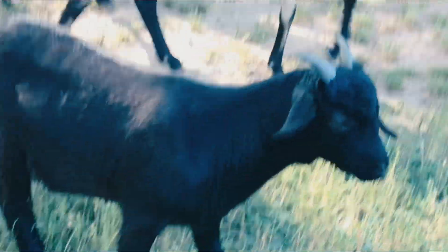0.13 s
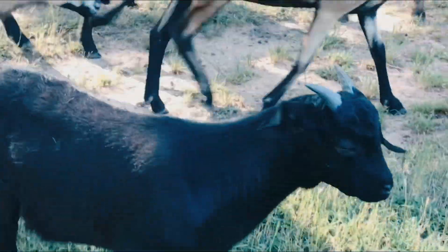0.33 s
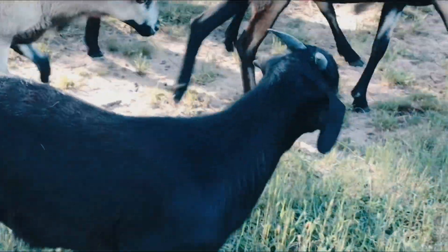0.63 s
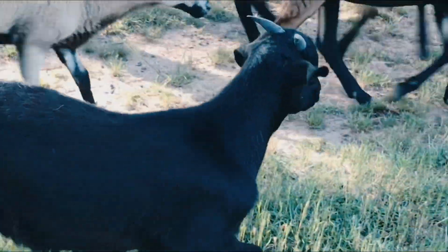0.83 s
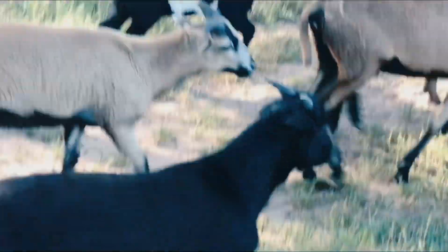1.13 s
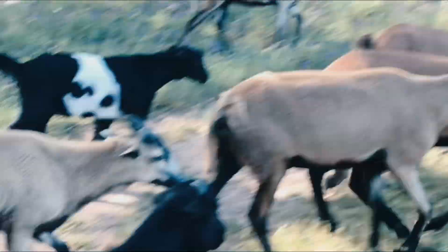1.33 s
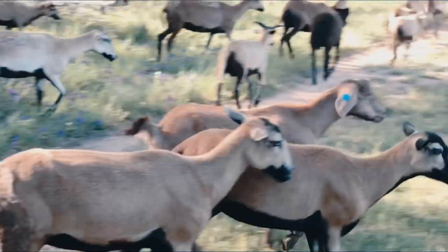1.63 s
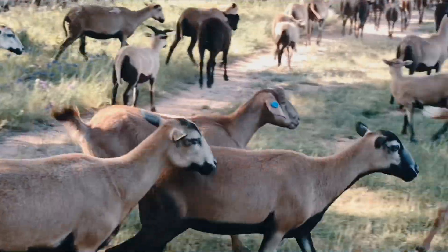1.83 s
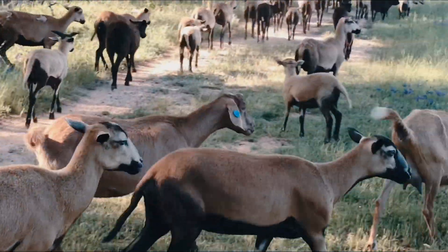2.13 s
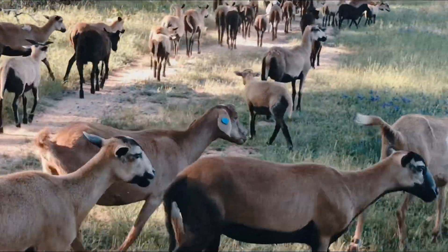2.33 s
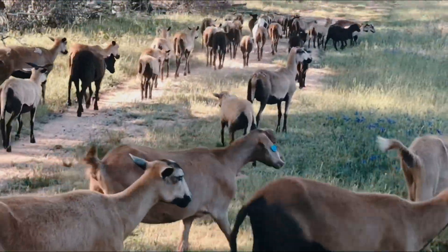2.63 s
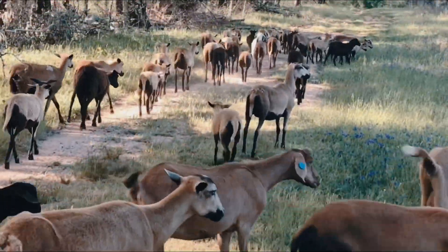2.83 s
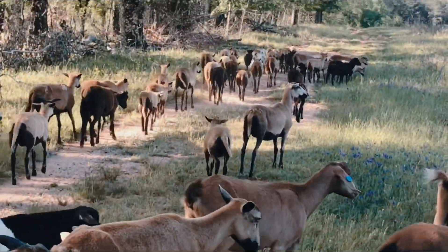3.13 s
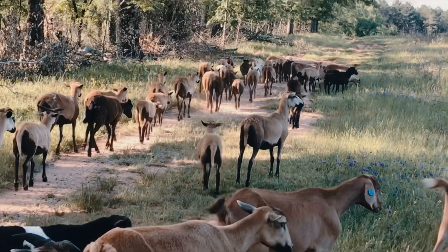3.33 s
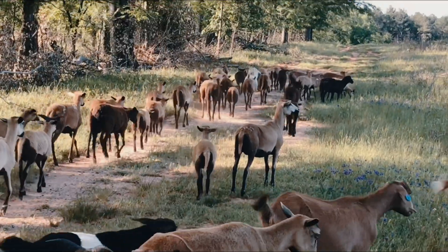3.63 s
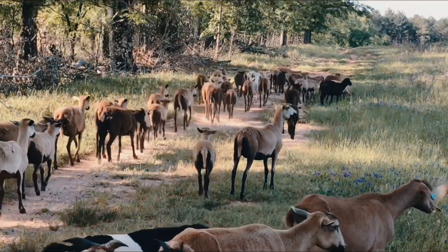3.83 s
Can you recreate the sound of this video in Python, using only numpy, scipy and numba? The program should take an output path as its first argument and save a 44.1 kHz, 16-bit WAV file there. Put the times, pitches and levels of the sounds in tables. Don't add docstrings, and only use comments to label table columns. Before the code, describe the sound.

A sheep flock passes a microphone in an open field with soft wind, low far engine drone and tiny bird chirps; a faint quavering lamb bleat comes early, a loud rough close baa ends it.

```python
import sys
import numpy as np
from scipy import signal
from scipy.io import wavfile
from scipy.ndimage import uniform_filter1d
from numba import njit

SR = 44100
rng = np.random.default_rng(int(sys.argv[2]) if len(sys.argv) > 2 else 0)


def log_audio(samples):
    frames = np.atleast_2d(samples).T
    limited = np.clip(frames, -1, 1)
    pcm = np.round(limited * 32767).astype(np.int16)
    wavfile.write(sys.argv[1], SR, pcm)


def nominal_scale(level):
    x = np.asarray(level, float) / 20
    return 10 ** x


N = 176400
T = np.arange(N) / SR

# t/s, pitch f/Hz, level/dB
SHEEP_PHRASES = [
    [(3.378, 309.9, -62), (3.4, 270.4, -43.5), (3.425, 200, -43), (3.452, 165.1, -54), (3.478, 155.6, -50),
     (3.508, 164.5, -42.5), (3.54, 180.6, -47), (3.576, 196.2, -34), (3.602, 197.2, -37)],
    [(3.626, 194.1, -52), (3.64, 197.2, -38), (3.666, 198.6, -35.5), (3.722, 202.4, -34),
     (3.756, 208.8, -37)],
    [(3.778, 213.1, -36.5), (3.816, 217.2, -28.5), (3.838, 212.2, -31), (3.852, 220.1, -28.5),
     (3.874, 226, -30), (3.906, 214.4, -30), (3.936, 196, -29.5), (3.964, 208, -32), (4.0, 196.7, -28.5)],
]
# t/s, mouth over nose level/dB, jaw drop/0-1, roughness/0-1
SHEEP_MOUTH = [(3.39, -13, 0.08, .3), (3.425, -2, 0.32, 0.39), (3.45, -10, 0.1, 0.32),
               (3.5, -3, 0.26, 0.48), (3.57, -4, 0.1, 0.22), (3.62, -4, 0.01, 0.25),
               (3.64, -18.5, 0.1, 0.15), (3.735, -20.5, 0.6, 0.07), (3.76, -1, 0.83, 0.09),
               (3.8, 15, 0.86, 0.19), (3.85, 16, 0.93, 0.23), (3.91, 16, 0.96, 0.26), (4.0, 12, 0.92, 0.26)]
# jaw shut f/Hz, jaw dropped f/Hz, width/Hz, shut level/dB, dropped level/dB
SHEEP_TRACT = [(390, 680, 190, -29, -4.5), (1000, 1592, 254, 6, -1.5), (2450, 2456, 180, -10, 4),
               (2690, 2943, 160, -15.5, 1.5), (3730, 3900, 250, -17, -12.5), (4630, 4800, 230, -37, -16.5),
               (5470, 5640, 290, -34, -21.5), (6750, 6850, 200, -36, -22.5)]
# t/s, half length/s, depth at 1.5 kHz/dB, depth at 4.5 kHz/dB
THROAT_SPASMS = [
    (3.837, .016, 2, 12),
    (3.877, .019, 11, 6),
    (3.939, .021, 13, 14),
    (4.0, .016, 4, 5),
]
# t/s, peak level/dB, pitch f/Hz
HOOF_THUDS = [(0.059, -41, 99.6), (0.309, -37, 96.9), (0.349, -40, 98), (0.387, -44, 86.1),
              (0.483, -41, 94.2), (0.543, -41, 81), (0.939, -48, 91.5), (1.111, -41, 98),
              (1.264, -40.5, 91.5), (1.383, -35, 70.0), (1.499, -37.5, 61.5), (1.599, -45, 70.5),
              (1.794, -40.5, 109), (1.895, -40, 91.5), (2.019, -42, 94.2), (2.269, -43, 78.5),
              (2.949, -42, 86.1)]
# t/s, peak level/dB, pitch f/Hz
STONE_KNOCKS = [(.002, -32, 1220), (0.061, -40, 322), (.068, -42, 380), (.074, -45, 448),
                (.246, -37.5, 950), (.313, -45, 900), (0.317, -50, 400), (.356, -44, 900),
                (.487, -40.5, 483), (.511, -41, 704), (.537, -44, 800), (1.113, -40, 770),
                (1.389, -43, 293), (1.49, -55, 397), (1.902, -50, 490), (2.6, -49, 890), (3.048, -34, 2300),
                (3.048, -40, 1300)]
# t/s, level/dB, half length/s, centre f/Hz
GRASS_SWISHES = [(.02, -53.5, 0.16, 2970), (0.202, -64, 0.041, 9000), (0.277, -56.5, .06, 9000),
                 (0.424, -53, 0.048, 9000), (0.61, -53, .02, 9000), (.69, -57, 0.046, 8000),
                 (.85, -56, 0.06, 8000), (1.02, -53, 0.14, 9000), (1.128, -62, .06, 9000),
                 (1.35, -51, 0.15, 8850), (1.498, -54, .06, 8950), (1.747, -58.5, 0.12, 9000),
                 (1.878, -54, 0.091, 9000), (1.955, -53.5, 0.031, 9000), (2.12, -54.5, 0.051, 9000),
                 (2.328, -66, 0.077, 9000), (2.616, -53.5, 0.035, 4000), (2.9, -73, .06, 9000),
                 (3.049, -52.5, 0.0099, 2470), (3.19, -57, .05, 9000), (3.58, -63, 0.05, 9000),
                 (3.97, -56.5, 0.072, 8770)]
# t/s, pitch f/Hz, level/dB
LAMB_THROBS = [(1.026, 402, -47.5), (1.104, 383.3, -50), (1.182, 371.7, -49), (1.258, 362.3, -51.5),
               (1.329, 356.7, -52), (1.403, 352, -52.5), (1.471, 347.3, -54.5)]
# f/Hz, width/Hz, level/dB
LAMB_RESONANCES = [(800, 230, 1.5), (1500, 760, -5.5), (2160, 290, 3), (3580, 490, 2.5), (5730, 720, -3)]
# t/s, length/s, start f/Hz, end f/Hz, level/dB
WHISTLES = [(.15, .04, 4950, 5050, -70), (0.235, 0.082, 4920, 5020, -61), (.37, .07, 4900, 5030, -62),
            (0.7, 0.055, 3500, 2940, -59), (0.753, 0.15, 2920, 2660, -61.5),
            (1.437, 0.037, 4700, 4860, -61), (1.503, 0.037, 4650, 5050, -60),
            (1.575, 0.033, 4600, 4750, -59.5), (1.67, .025, 4750, 4950, -61.5),
            (1.74, .025, 4600, 4800, -65), (1.946, 0.04, 3520, 3370, -61), (1.984, 0.023, 3230, 3130, -61),
            (2.212, .025, 3450, 3320, -62), (2.235, .02, 3090, 2970, -65), (2.475, 0.029, 4020, 3950, -64),
            (2.544, 0.023, 3180, 3040, -62), (2.598, 0.028, 3300, 3110, -60),
            (2.647, .025, 3250, 3000, -62), (1.217, 0.023, 957, 934, -56), (1.301, 0.022, 914, 940, -57.5),
            (1.414, 0.066, 1010, 935, -60), (3.28, 0.055, 1327, 1380, -61), (0.849, 0.061, 289, 305, -55.5)]
# f/Hz, density level/dB per Hz
WIND_SPECTRUM = [(22, -36), (55, -5.5), (110, -11.5), (220, -15), (480, -23.5), (800, -22), (3440, -27),
                 (15500, -32)]
# t/s, level/dB
WIND_GUSTS = [(0.0, -50.5), (1.04, -52), (3.35, -52)]
# f/Hz, width/Hz, depth/0-1
TREBLE_DIPS = [(7630, 640, 0.35), (10360, 1900, 0.59)]


def unit(x):
    return x / np.sqrt(np.mean(x ** 2) + 1e-18)


@njit
def svf_loop(x, hz, width_hz):
    y = np.empty(len(x))
    band_state, low_state = 0., 0.
    for i in range(len(x)):
        g = np.tan(np.pi * hz[i] / SR)
        damping = width_hz / hz[i]
        v = (band_state + g * (x[i] - low_state)) / (1 + g * (g + damping))
        band_state = 2 * v - band_state
        low_state += 2 * g * v
        y[i] = damping * v
    return y


def band(x, hz, width_hz):
    return svf_loop(x + 1e-18, hz + np.zeros(len(x)), 1. * width_hz)


def walk(rate_hz, size=N):
    hold = int(SR / rate_hz)
    steps = np.repeat(rng.standard_normal(size // hold + 1), hold)
    return 1.324 * uniform_filter1d(uniform_filter1d(steps, hold), hold)[:size]


def bump(t, start_s, length_s):
    return np.sin(np.pi * np.clip((t - start_s) / length_s, 0, 1)) ** 1.64


def glottis(hz, rough, count=36):
    n = len(hz)
    jitter = 1 + 0.0545 * rough * walk(180, size=n)
    phase = 2 * np.pi * np.cumsum(hz * jitter) / SR
    pulses = sum(np.cos(k * phase) for k in range(1, count + 1)) * np.sqrt(2 / count)
    air = rng.standard_normal(n) * (1 + np.cos(phase))
    return pulses * nominal_scale(4 * rough * walk(151.7, size=n)) + rough * air


def sheep_vowel(folds, jaw, low_db, high_db):
    choke_db = [0, low_db, 0.24 * high_db, 0.13 * high_db + .45 * low_db]
    vowel = 0
    for k, (shut_hz, open_hz, width_hz, shut_db, open_db) in enumerate(SHEEP_TRACT):
        hz = shut_hz + (open_hz - shut_hz) * np.clip(jaw, 0, 1) ** (5 if k == 0 else .8)
        db = shut_db + (open_db - shut_db) * jaw - (choke_db[k] if k < 4 else high_db)
        ring = band(band(folds, hz, 2 * width_hz), hz, width_hz)
        vowel = vowel + (-1) ** k * nominal_scale(db) * ring / np.sqrt(width_hz)
    return vowel


def sheep_nose(folds, hz):
    nose_hz, width_hz, second_db = np.maximum(hz, 0.89 * 208), 115, -17
    hum = band(band(folds, nose_hz, width_hz), nose_hz, width_hz)
    return hum + nominal_scale(second_db) * band(folds, 2 * hz, 53)


def near_sheep():
    rows, mouth = np.vstack([np.array(p) for p in SHEEP_PHRASES]), np.array(SHEEP_MOUTH)
    start_s = rows[0, 0]
    first = int((start_s - .05) * SR)
    t = T[first:]
    hz, level_db = (np.interp(t, rows[:, 0], rows[:, k]) for k in (1, 2))
    open_db, jaw, rough = (np.interp(t, mouth[:, 0], mouth[:, k]) for k in (1, 2, 3))
    low_db, high_db = (sum(r[k] * bump(t, r[0] - r[1], 2 * r[1]) for r in THROAT_SPASMS) for k in (2, 3))
    folds = glottis(hz, np.clip(rough + 0.017 * high_db, 0, 1))
    mouth_share = 1 / (1 + nominal_scale(-2 * open_db))
    voice = unit(sheep_vowel(folds, jaw, low_db, high_db)) * np.sqrt(mouth_share)
    voice = voice + unit(sheep_nose(folds, hz)) * np.sqrt(1 - mouth_share)
    chest = unit(band(band(folds, 2 * hz, 120), 2 * hz, 120))
    voice = voice + nominal_scale(-21) * mouth_share * chest
    onset = np.clip((t - start_s) / 0.011 + 1, 0, 1)
    return np.pad(voice * nominal_scale(level_db) * onset, (first, 0))


def hooves():
    out, t, t60_s = np.zeros(N + SR), T[:SR // 10], 0.053
    push = np.exp(-t * np.log(1000) / t60_s) * np.minimum(t / 0.003, 1)
    for s, db, hz in HOOF_THUDS:
        puff = unit(band(rng.standard_normal(len(t)), 2.06 * hz, 3 * hz))
        out[int(s * SR):][:len(t)] += nominal_scale(db) * push * (np.sin(2 * np.pi * hz * t) + 0.63 * puff)
    return out[:N]


def knocks():
    out, t, decay_cycles, gain_db = np.zeros(N + SR), T[:SR // 20], 4.3, 2.5
    for s, db, hz in STONE_KNOCKS:
        grit = unit(band(rng.standard_normal(len(t)), 2.9 * hz, 3 * hz))
        ring = np.sin(2 * np.pi * hz * t) + 0.21 * grit
        decay = np.exp(-t * hz / decay_cycles * 2) * np.minimum(t * hz * 2, 1)
        out[int(s * SR):][:len(t)] += nominal_scale(db + gain_db) * ring * decay
    return out[:N]


def grass():
    crackle_db = 2.9 * rng.exponential(size=N // 30 + 1).repeat(30)[:N]
    crackle = rng.standard_normal(N) * nominal_scale(crackle_db)
    out = nominal_scale(-63 + 4 * walk(16)) * unit(band(crackle, 9700, 14000))
    for s, db, half_s, hz in GRASS_SWISHES:
        i = slice(max(int((s - half_s) * SR), 0), int((s + half_s) * SR))
        cluster = unit(band(crackle[::-1][i], hz, 1.9 * hz))
        out[i] += nominal_scale(db) * bump(T[i], s - half_s, 2 * half_s) * cluster
    return out


def far_lamb():
    throb_s, sag, rough, hold_db = 0.046, 0.0292, 0.22, -59
    rows = np.array(LAMB_THROBS)
    first, last = int(SR * .95), int(SR * 1.7)
    t = T[first:last]
    k = np.clip(np.searchsorted(rows[:, 0], t) - 1, 0, len(rows) - 1)
    progress = np.clip((t - rows[k, 0]) / throb_s, 0, 1)
    hz = uniform_filter1d(rows[k, 1] * (1 + sag * (.5 - progress)), 200)
    folds = glottis(hz, rough, count=18)
    voice = 0
    for j, (f, width_hz, db) in enumerate(LAMB_RESONANCES):
        voice = voice + (-1) ** j * nominal_scale(db) * band(band(folds, f, 2 * width_hz), f, width_hz)
    throbs = sum(nominal_scale(db) * bump(t, s, throb_s) for s, _, db in rows)
    held = nominal_scale(hold_db) * bump(t, rows[0, 0], 0.49) ** 0.35
    voice = unit(voice) * (throbs + held)
    echo = sum(nominal_scale(db) * np.roll(voice, int(s * SR)) for s, db in [(.013, -12), (.027, -14)])
    return np.pad(voice + echo, (first, N - last))


def whistles():
    out, waver = np.zeros(N), walk(90)
    for s, length_s, from_hz, to_hz, db in WHISTLES:
        i = slice(int(s * SR), int((s + length_s) * SR))
        u = np.clip((T[i] - s) / length_s, 0, 1)
        hz = (to_hz + (from_hz - to_hz) * (1 - u) ** 1.32) * (1 + .004 * waver[::-1][i])
        level = nominal_scale(db + 5.0 + 2.2 * waver[i]) * np.sin(np.pi * u) ** 0.5
        out[i] += level * np.sin(2 * np.pi * np.cumsum(hz) / SR)
    return out


def wind():
    out, shared = 0, walk(6.2)
    spectrum, gusts = np.array(WIND_SPECTRUM), np.array(WIND_GUSTS)
    for hz in 28 * 2 ** np.arange(0, 9.2, .5):
        db = np.interp(np.log(hz), np.log(spectrum[:, 0]), spectrum[:, 1])
        db = db + 0.61 * shared + 0.91 * walk(9.01)
        out = out + nominal_scale(db) * band(band(rng.standard_normal(N), hz, hz / 2), hz, hz / 2)
    return unit(out) * nominal_scale(np.interp(T, gusts[:, 0], gusts[:, 1]) + 3.0)


def drone():
    tone_db, blur_db = -51, -54.5
    hz = 94.9 * (1 + 0.025 * walk(5.5))
    tone = nominal_scale(tone_db + 3 + 2.5 * walk(17)) * np.sin(2 * np.pi * np.cumsum(hz) / SR)
    blur = unit(band(band(rng.standard_normal(N), hz, 13.3), hz, 30))
    return tone + nominal_scale(blur_db) * blur


def scene():
    animals = near_sheep() + hooves() + knocks() + grass() + far_lamb() + whistles()
    return (animals + wind() + drone())[None]


def band_limit(x):
    return signal.sosfilt(signal.butter(12, 15730, fs=SR, output="sos"), x)


def record(dry):
    x = dry[0]
    for hz, width_hz, depth in TREBLE_DIPS:
        x = x - depth * band(x, hz, width_hz)
    return band_limit(x[None])


dry = scene()
out = record(dry)
log_audio(out)
```